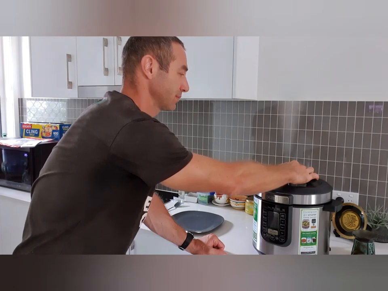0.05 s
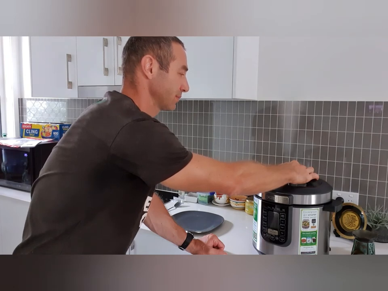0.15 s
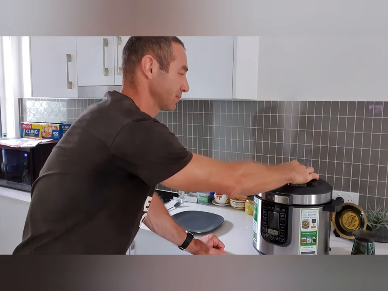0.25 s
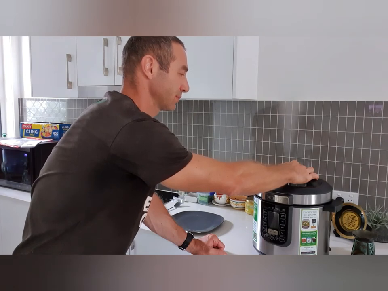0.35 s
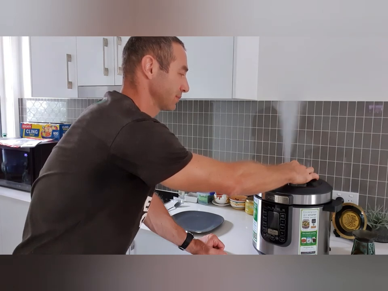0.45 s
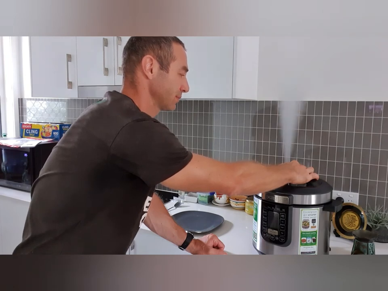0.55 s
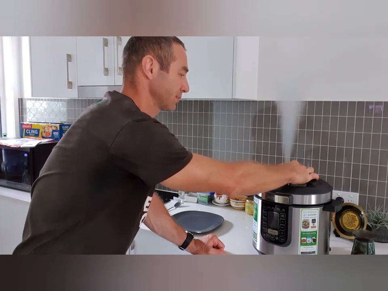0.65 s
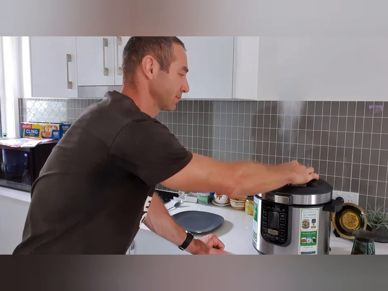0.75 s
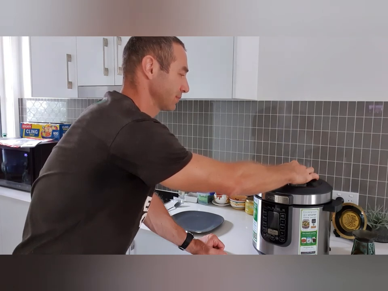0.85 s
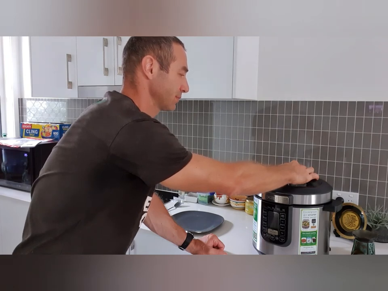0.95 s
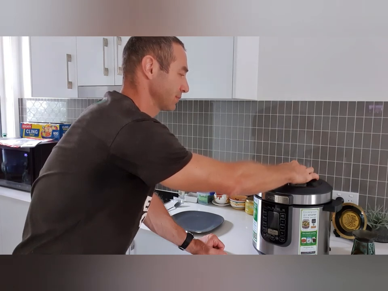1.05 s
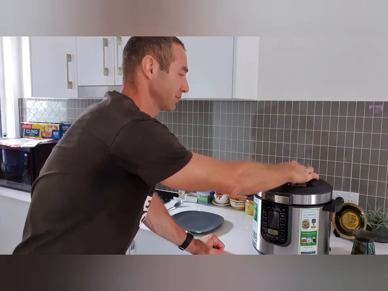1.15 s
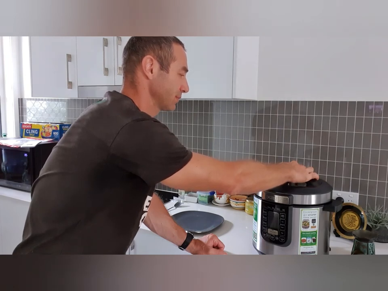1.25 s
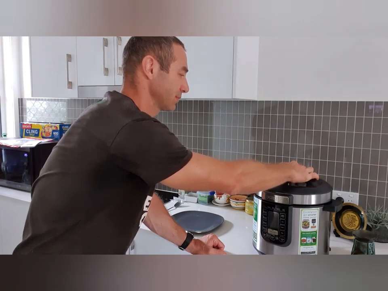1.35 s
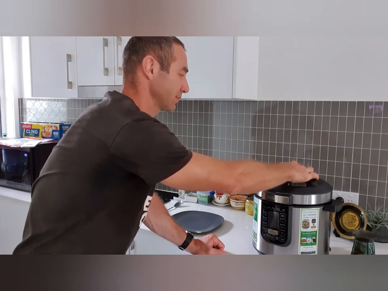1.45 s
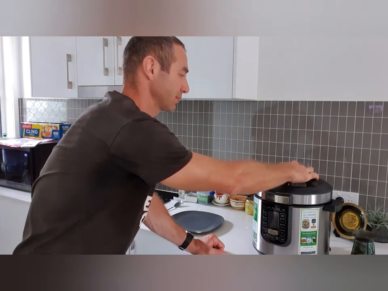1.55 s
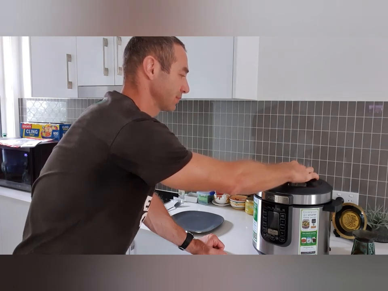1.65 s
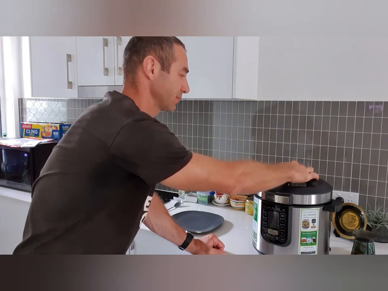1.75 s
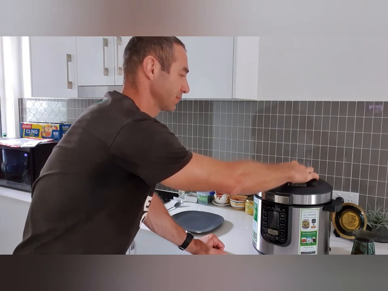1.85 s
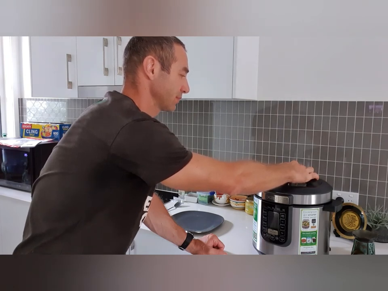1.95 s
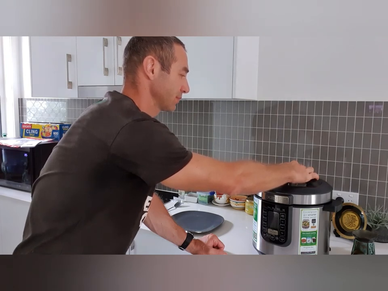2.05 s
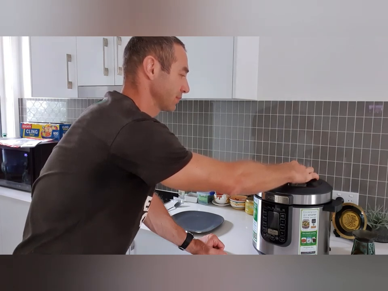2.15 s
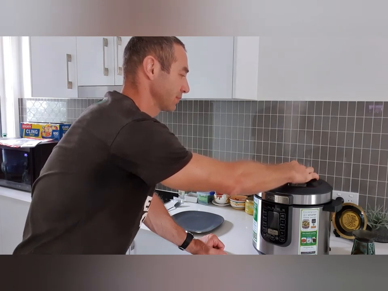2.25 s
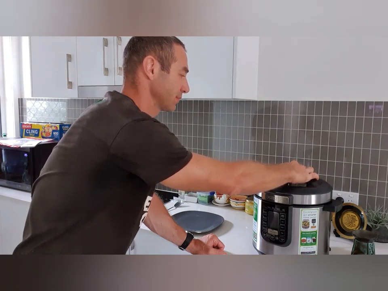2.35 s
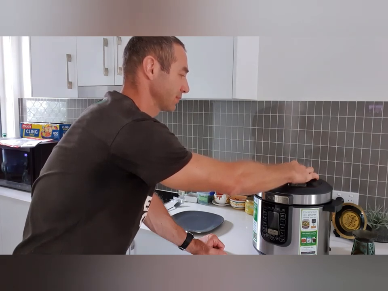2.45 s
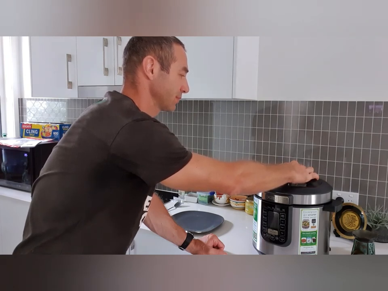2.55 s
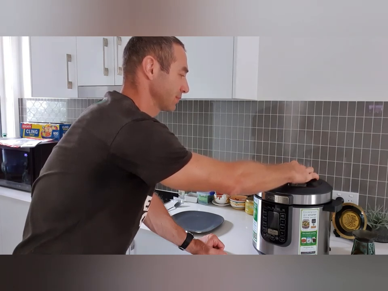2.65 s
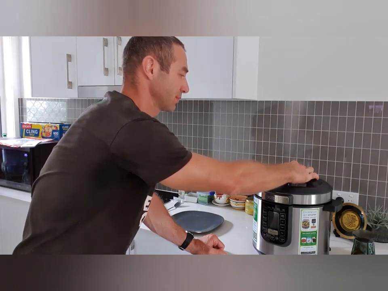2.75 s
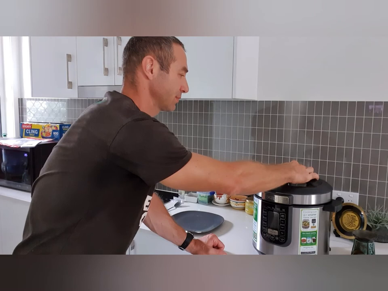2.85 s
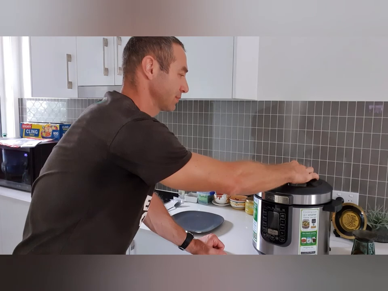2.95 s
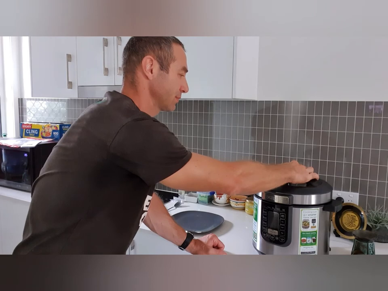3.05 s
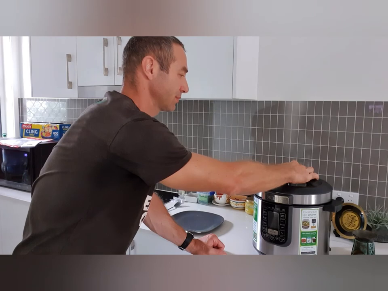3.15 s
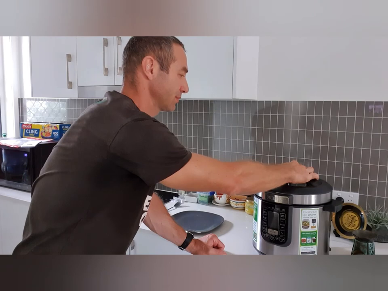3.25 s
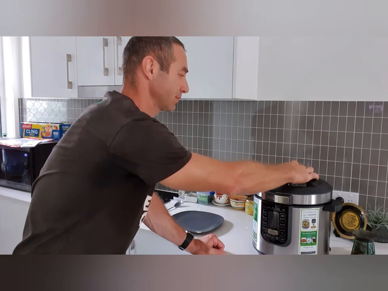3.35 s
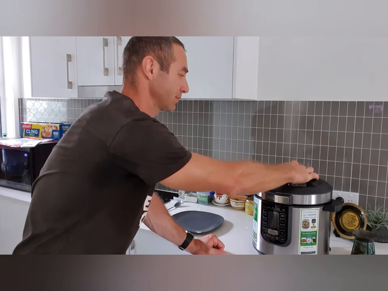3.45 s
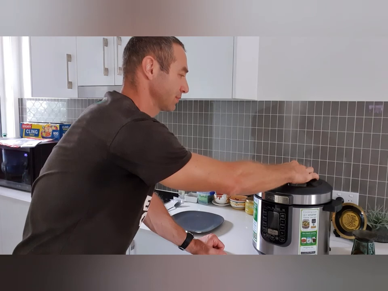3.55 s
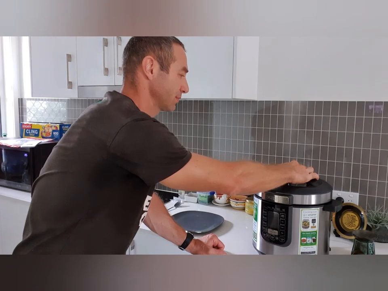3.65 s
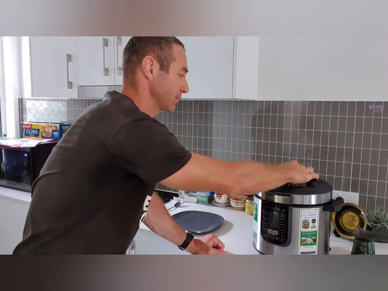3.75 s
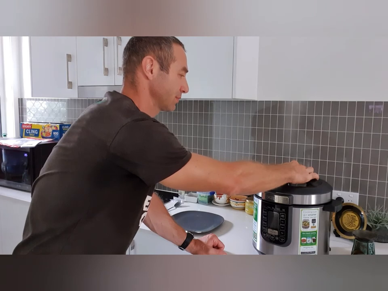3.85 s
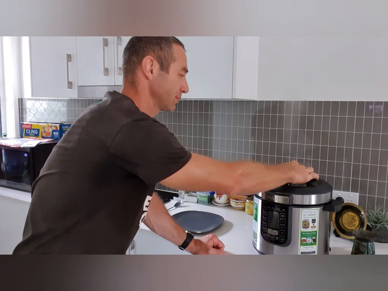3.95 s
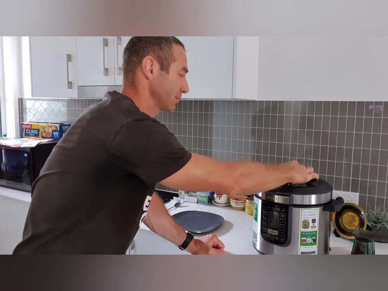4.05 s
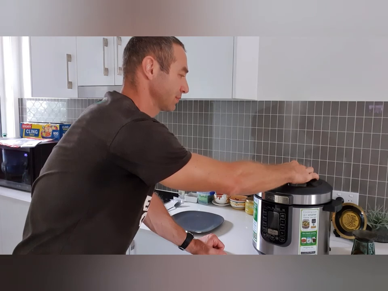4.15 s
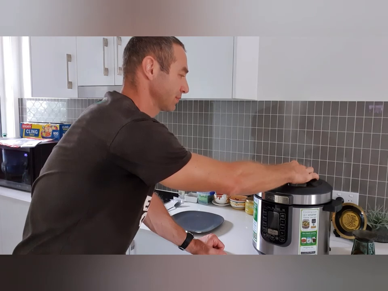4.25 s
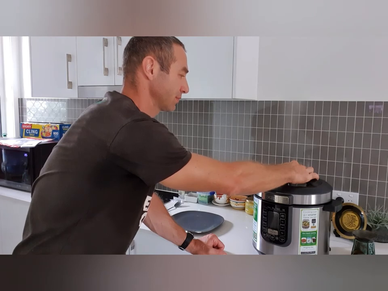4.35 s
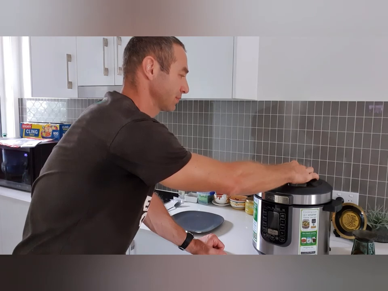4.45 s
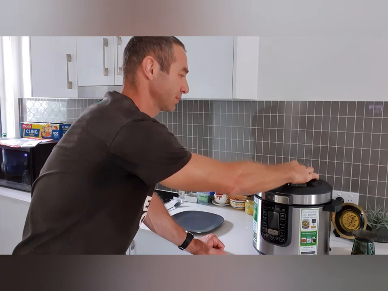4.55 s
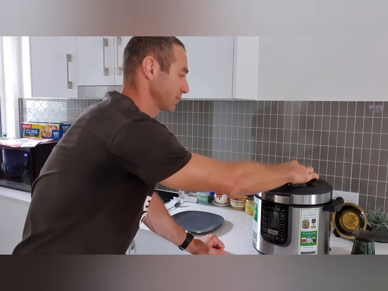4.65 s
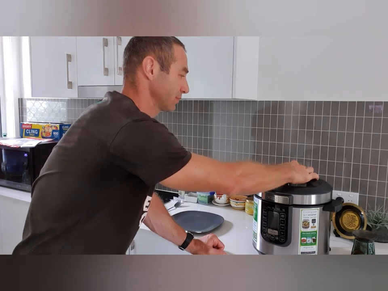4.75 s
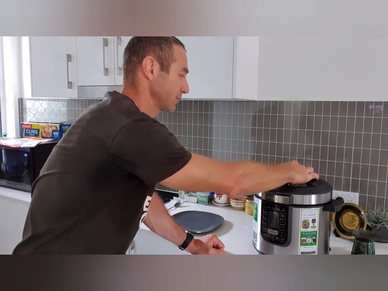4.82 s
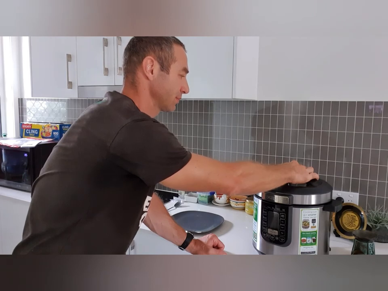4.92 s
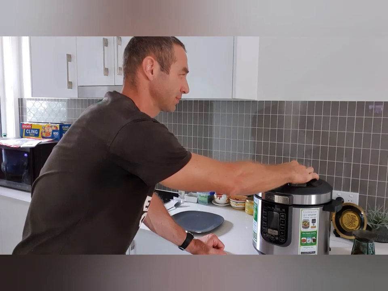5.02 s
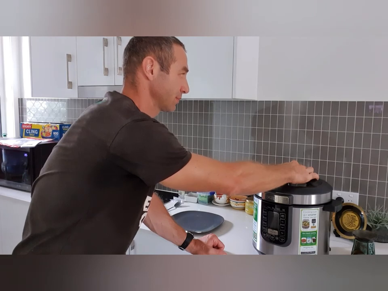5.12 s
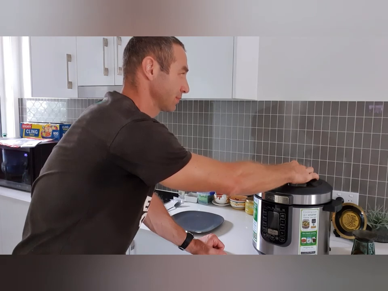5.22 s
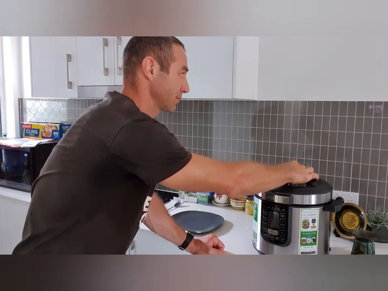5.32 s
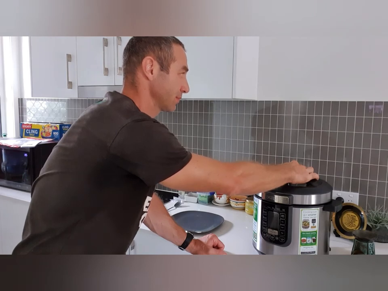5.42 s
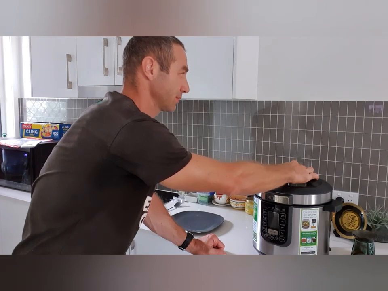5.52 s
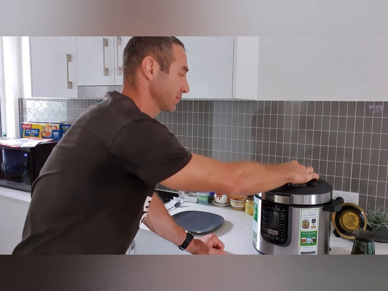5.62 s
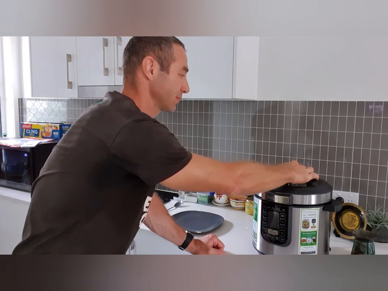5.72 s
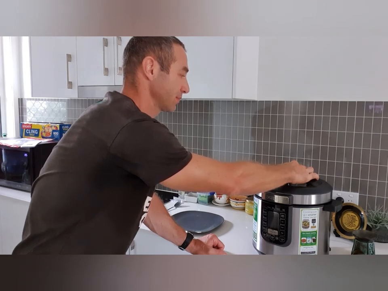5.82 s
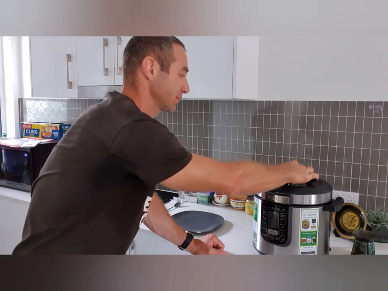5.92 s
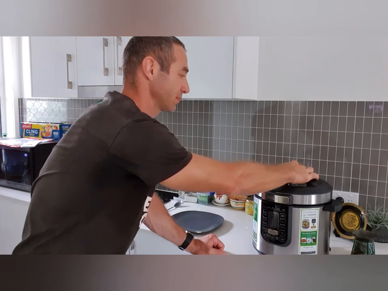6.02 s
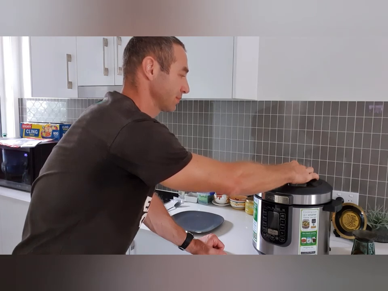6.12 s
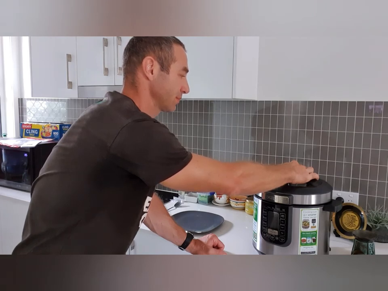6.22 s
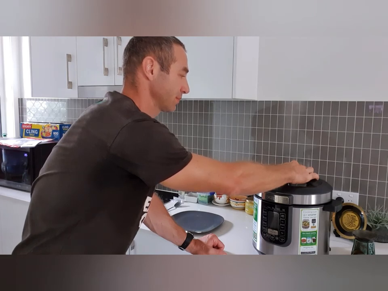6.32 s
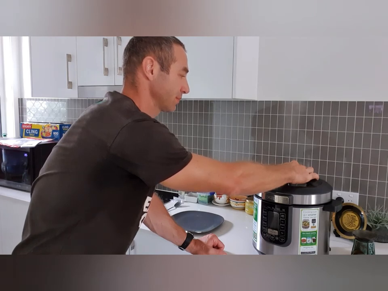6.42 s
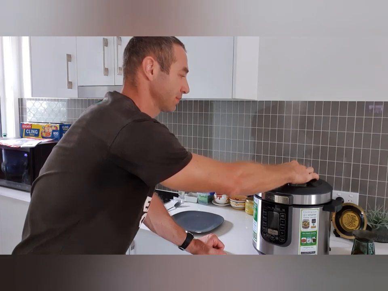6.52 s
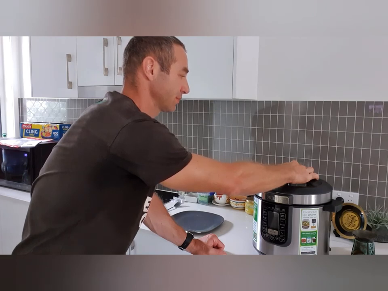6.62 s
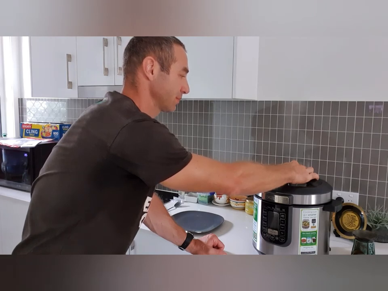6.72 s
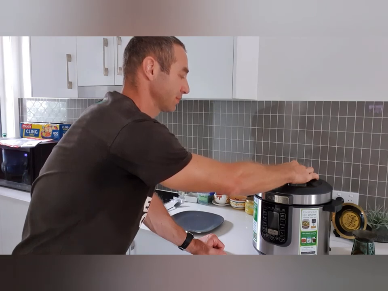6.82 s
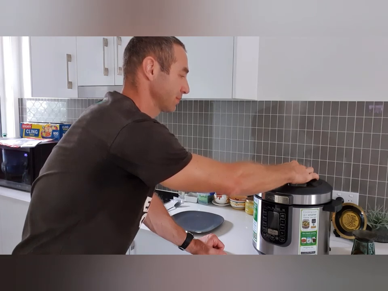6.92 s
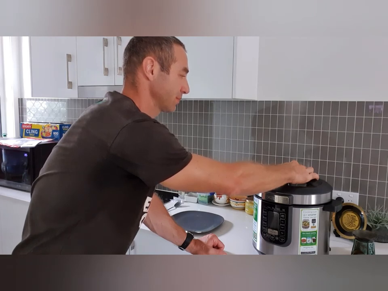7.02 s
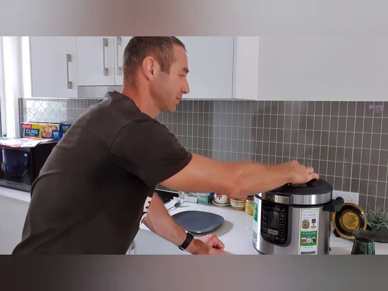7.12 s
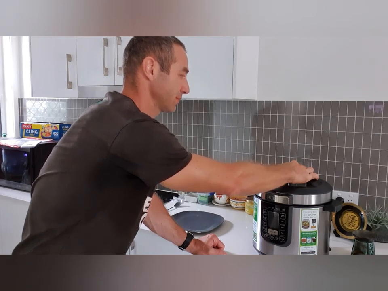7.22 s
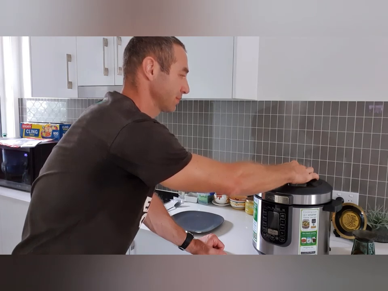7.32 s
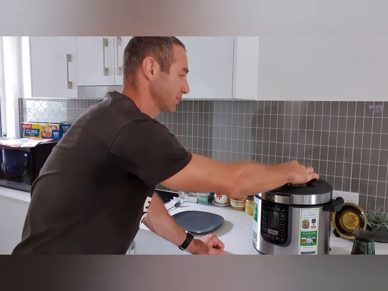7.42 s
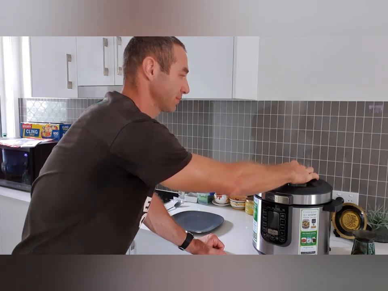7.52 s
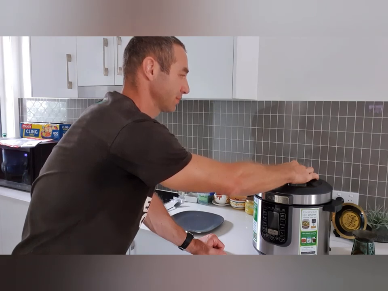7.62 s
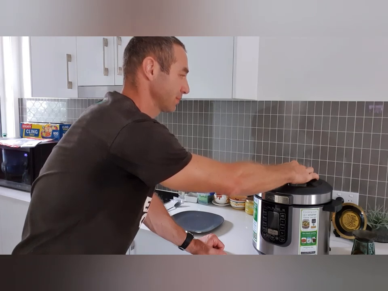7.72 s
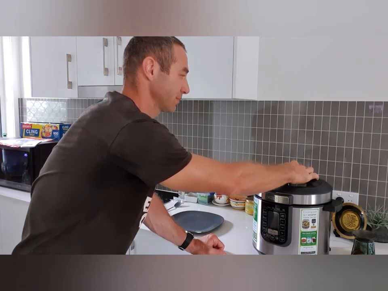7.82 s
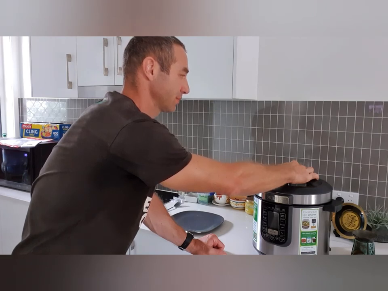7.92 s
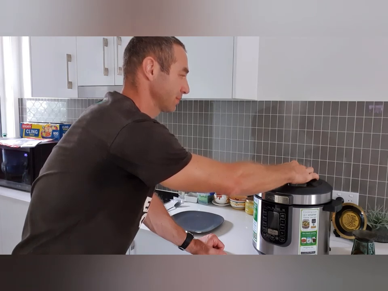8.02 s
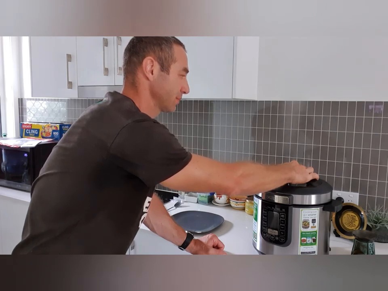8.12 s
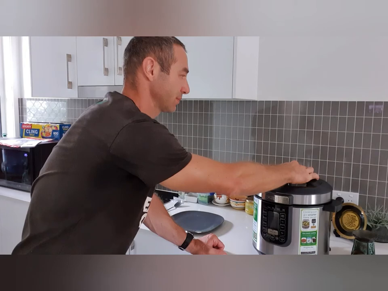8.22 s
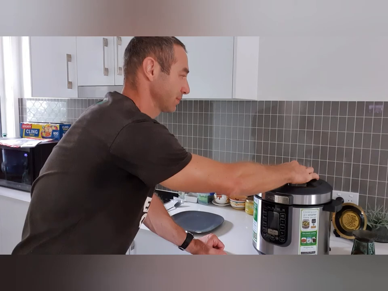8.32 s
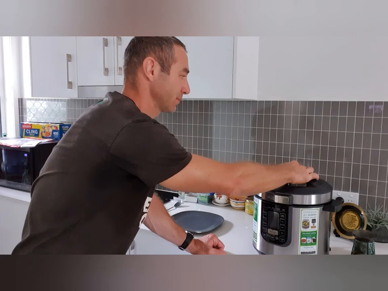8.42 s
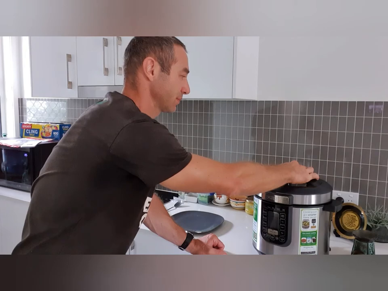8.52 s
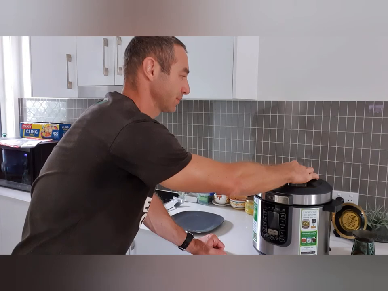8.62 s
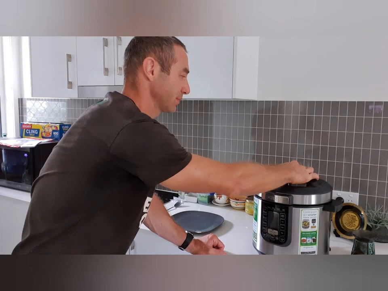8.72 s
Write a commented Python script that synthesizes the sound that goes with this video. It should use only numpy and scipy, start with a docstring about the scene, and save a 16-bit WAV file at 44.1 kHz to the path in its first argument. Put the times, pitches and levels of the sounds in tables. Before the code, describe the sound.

Steam hisses sharply from a cooker valve, bursts into a roar, stops dead, then after over a second reopens into a long, bright hiss.

```python
"""A hiss, then a roar: steam escapes from a pressure cooker valve in a tiled kitchen, heard by a stereo pair.
The valve hisses, opens wide so that the jet roars under the cupboard, shuts with a low push, reopens to a hiss.
Steam is coloured noise, shaped by valve gains and the narrow resonances of the lid and the niche.
The hard room rings on after the stop; a tap on the lid is a short ring of sines.
House noise and a low wavering hum lie underneath."""
import sys
import numpy as np
from scipy import signal
from scipy.fft import rfft, irfft, next_fast_len
from scipy.io import wavfile
from scipy.ndimage import uniform_filter1d, map_coordinates

SR = 44100
rng = np.random.default_rng(int(sys.argv[2]) if len(sys.argv) > 2 else 0)


def elevation(decibels):
    """Turn decibel levels (scalar or array-like) into linear amplitude ratios."""
    levels = np.asarray(decibels, float)
    return 10 ** (levels / 20)


def log_audio(samples):
    """Write samples as a 16-bit WAV file to the path given in sys.argv[1]."""
    # one column per channel
    frames = np.atleast_2d(samples).T
    # limit to full scale, then quantise
    limited = np.clip(frames, -1, 1)
    pcm = np.round(limited * 32767).astype(np.int16)
    wavfile.write(sys.argv[1], SR, pcm)


N = 386757


def unit(x):
    """Scale to rms 1."""
    return x / np.sqrt(np.mean(x ** 2) + 1e-20)


def along(points, hz):
    """(Hz, value) points read on a log frequency axis."""
    point_hz, value = np.transpose(points)
    return np.interp(np.log(hz + 1), np.log(point_hz + 1), value)


def levels(rows):
    """One value per sample for each column after the time."""
    s, *cols = np.transpose(rows)
    return np.array([np.interp(np.arange(N) / SR, s, c) for c in cols])


def since(start_s):
    """Seconds after a moment, zero before it."""
    return np.maximum(np.arange(N) / SR - start_s, 0)


def wobble(rate_hz):
    """Smooth random curve, rate_hz knots a second."""
    knots = rng.standard_normal(int(N * rate_hz / SR) + 4)
    return map_coordinates(knots, [np.arange(N) * rate_hz / SR])


def filtered(x, response):
    """x times a response of frequency."""
    n = x.shape[-1]
    m = next_fast_len(n + 8192)
    spectrum = rfft(x, m) * response(np.fft.rfftfreq(m, 1 / SR))
    return irfft(spectrum, m)[..., :n]


def noise(spectrum, count):
    """Unrelated coloured noises of rms 1."""
    white = rng.standard_normal((count, N))
    return unit(filtered(white, lambda hz: elevation(along(spectrum, hz))))


# left-right correlation: freq_hz, correlation
LIKENESS = [(60, 0.95), (130, 0.85), (290, 0.97), (640, 0.68), (1410, 0.11), (3100, 0), (6820, -0.06),
            (15000, -0.1)]


def pair(two):
    """Two unrelated signals become left and right: alike in the bass, unrelated in the treble."""
    def mid_side(hz):
        angle = np.arccos(np.clip(along(LIKENESS, hz), -1, .97)) / 2
        return np.array([np.cos(angle), np.sin(angle)])

    mid, side = filtered(two, mid_side)
    return np.array([mid + side, mid - side])


# reverberation time: freq_hz, t60_s
REVERB_TIME = [(150, 0.55), (600, 0.56), (2000, 0.66), (5000, 0.62), (9000, 0.54), (15000, 0.37)]


def kitchen(x, direct_db):
    """Direct path, left side first, and a tail whose every frequency dies at its own speed."""
    hz, t, grains = signal.stft(rng.standard_normal((2, SR)), SR, nperseg=256)
    t60_s = along(REVERB_TIME, hz)[:, None]
    decay = elevation(-60 * t / t60_s) / np.sqrt(t60_s)  # equal energy at every frequency
    tail = pair(signal.istft(grains * decay, SR, nperseg=256)[1])
    tail = tail / np.linalg.norm(tail) * np.sqrt(2)
    answer = np.pad(tail, ((0, 0), (200, 0)))
    answer[[0, 1], [0, 5]] = elevation(direct_db)  # relative to the tail; right 5 samples later
    answer = answer / np.sqrt(1 + elevation(2 * direct_db))
    before = x[SR // 3:0:-1]  # what sounds at the start was sounding already and fills the room
    wet = signal.fftconvolve(np.r_[before, x][None], answer, axes=1)
    return wet[:, len(before):][:, :N]


# resonances of the lid and the niche under the cupboard: centre_hz, width_hz, gain_db
RESONANCES = [(403, 43, 3.5), (596, 18, 8), (640, 14, 6.5), (680, 16, 6.5), (799, 40, 6.5), (1027, 50, 4.5),
              (1215, 21, 6.5), (1300, 22, 8), (1501, 25, 5), (1604, 31, 7.5), (1790, 16, 5), (1870, 21, 5),
              (1930, 22, 8.5), (2126, 35, 6.5), (2290, 26, 4.5), (2480, 30, 3.5), (2670, 30, 6.5),
              (2836, 40, 5.5), (5060, 21, 7), (5130, 22, 9.5), (5430, 35, 7), (5550, 25, 6),
              (5772, 19, 6.5), (5929, 21, 3), (6080, 30, 3.5), (8254, 25, 5), (8599, 22, 4), (8720, 21, 3),
              (9070, 25, 2.5), (9200, 25, 3.5)]


def niche(x):
    """Narrow resonances lift the noise."""
    def gain(f):
        return elevation(sum(db / (1 + (2 * (f - hz) / width) ** 2) for hz, width, db in RESONANCES))

    return filtered(x, gain)


# house noise: time_s, level_db
HOUSE_LEVEL = [(0, -75), (1.1, -61.5), (1.35, -63.5), (1.55, -57.5), (2.06, -56), (2.2, -51), (2.6, -50.5),
               (3.6, -54), (5, -57), (6.5, -54), (8.77, -62)]
# house noise spectrum: freq_hz, relative_db
HOUSE_SPECTRUM = [(15, -47), (28, -24.5), (52, -15.5), (115, -21), (170, -26), (235, -22.5), (300, -28),
                  (600, -24.5), (1000, -23.5), (1300, -31), (2200, -35), (2700, -44), (5000, -61.5),
                  (16000, -77)]
# hum before wavering: time_s, level_db, pitch_hz
HUM_COURSE = [(0, -72, 76), (1.44, -74, 73), (1.71, -60, 72), (2.4, -64, 70), (2.93, -55, 72),
              (3.6, -67, 77), (4.9, -63, 78), (5.3, -51, 78), (5.52, -63, 78), (5.74, -48.5, 78),
              (6.6, -49, 78), (6.8, -54, 78), (7.1, -55, 78), (7.69, -50, 78), (7.94, -55, 78),
              (8.09, -69, 78), (8.25, -54, 78), (8.55, -54, 78), (8.77, -67, 78)]
# faint tone a fifth above the hum, before wavering: time_s, level_db
FIFTH_LEVEL = [(4.2, -80), (4.6, -67), (6.6, -66), (6.9, -80)]
STRONG_HUM_DB, WAVER_DB_PER_DB = -47, .5  # the weaker the hum under this level, the more it wavers


def house():
    """Dull noise that reaches the right side first; a low unsteady hum with a weak third harmonic."""
    hum_db, hum_hz = levels(HUM_COURSE)
    phase = 2 * np.pi * np.cumsum(hum_hz + 1.1 * wobble(6.1)) / SR
    weakness_db = np.clip(STRONG_HUM_DB - hum_db, 0, 12)
    hum_db = hum_db + WAVER_DB_PER_DB * weakness_db * wobble(7)
    hum = elevation(hum_db) * (np.sin(phase) + elevation(-16) * np.sin(3 * phase))
    fifth = elevation(levels(FIFTH_LEVEL) + 2.5 * wobble(5)) * np.sin(3 / 2 * phase)
    left, right = pair(noise(HOUSE_SPECTRUM, count=2))
    left = np.roll(left, 14)  # samples later
    return np.sqrt(2) * (hum + fifth) + elevation(levels(HOUSE_LEVEL)) * np.array([left, right])


# a finger taps the lid: start_s, level_db (before onset, decay and room)
LID_TAPS = [(1.372, -45)]


def taps():
    """Short dull tick on the plastic lid: three sines, 30 ms t60."""
    out, t = np.zeros(N), np.arange(2000) / SR
    ring = sum(np.sin(2 * np.pi * hz * t) for hz in (1030, 1300, 1500))
    onset = 1 - np.exp(-t / 0.0005)
    for start_s, level_db in LID_TAPS:
        out[round(start_s * SR):][:len(t)] += elevation(level_db - 1 - 60 * t / 0.03) * onset * ring
    return kitchen(out, direct_db=-2.0)


THUMP_S, THUMP_DB, THUMP_HZ, THUMP_T60_S = .701, -36, 75, .14


def thump():
    """Low push as the valve shuts: a soft decaying sine, alike on both sides."""
    t = since(THUMP_S)
    envelope = elevation(THUMP_DB - 60 * t / THUMP_T60_S) * (1 - np.exp(-t / .004))
    return envelope * np.sin(2 * np.pi * THUMP_HZ * t)


SHUT_S = .009  # time constant


def gate(opens_s, shuts_s, rise_s):
    """Gain that climbs to 1 on opening and dies on shutting."""
    return (1 - np.exp(-since(opens_s) / rise_s)) * np.exp(-since(shuts_s) / SHUT_S)


# valve open: opens_s, shuts_s
VALVE_OPEN = [(-1, .7), (2.119, 10)]
# roar spectrum: freq_hz, relative_db
ROAR_SPECTRUM = [(29, -56.5), (55, -23.5), (170, -12.5), (287, -19.5), (389, -9), (471, -9), (600, -5.5),
                 (720, -9.5), (830, -7.5), (1120, -7), (1600, -7.5), (1950, -13), (2150, -20),
                 (3000, -42.5), (5000, -120)]
ROAR_START_S, ROAR_DB, ROAR_RISE_S, ROAR_SURGE_DB = .372, -28, .015, 4
SURGE_S = .08  # time constant of an overshoot


def roar(parts=3):
    """Large eddies where the full jet strikes the cupboard, until the valve shuts."""
    surge_db = ROAR_SURGE_DB * np.exp(-since(ROAR_START_S) / SURGE_S)
    level = gate(ROAR_START_S, VALVE_OPEN[0][1], ROAR_RISE_S) * elevation(ROAR_DB + surge_db)
    eddies = level * elevation(1.5 * wobble(40)) * niche(noise(ROAR_SPECTRUM, count=parts))
    return sum(kitchen(part, direct_db=-2.5) for part in eddies) / np.sqrt(parts)


# valve positions, each held until the next: start_s, fizz_db, body_db, sheen_db, throat_db
VALVE_POSITIONS = [(0, -21.5, -31.5, 1.5, 0), (.385, -23, -30, -8.5, 0), (2.12, -26, -33.5, 0, 5),
                   (2.46, -22.5, -32, 0, .5), (2.98, -21.5, -30.5, -.5, 0), (3.52, -21.5, -32, -1, -1)]
# sudden widening, flow overshoots: start_s, overshoot_db
FLOW_SURGES = [(.38, 2), (2.47, 3)]
FIZZ_RISE_S, BODY_RISE_S = .012, .018  # time constants
TURN_S = .06  # from one position to the next
SAG_DB_PER_S = .2  # pressure falls from the last position on


def valve():
    """Gains of fizz and body and the colour of the fizz, from positions, surges and falling pressure."""
    start_s, *cols = np.transpose(VALVE_POSITIONS)
    held = np.array(cols)[:, np.searchsorted(start_s[1:], np.arange(N) / SR)]
    turned = uniform_filter1d(held, int(TURN_S * SR), axis=1, mode="nearest")
    fizz_db, body_db, sheen_db, throat_db = turned
    surge_db = sum(db * (since(at) > 0) * np.exp(-since(at) / SURGE_S) for at, db in FLOW_SURGES)
    flow_db = surge_db - SAG_DB_PER_S * since(start_s[-1])
    fizz_gate = sum(gate(a, b, FIZZ_RISE_S) for a, b in VALVE_OPEN)
    body_gate = sum(gate(a, b, BODY_RISE_S) for a, b in VALVE_OPEN)
    fizz, body = fizz_gate * elevation(fizz_db + flow_db), body_gate * elevation(body_db + flow_db)
    return fizz, body, elevation(sheen_db) - 1, elevation(throat_db) - 1


# treble turbulence spectrum: freq_hz, relative_db
FIZZ_SPECTRUM = [(1410, -33.5), (2400, -6.5), (2900, -5.5), (3550, -5), (3720, -9.5), (3950, -6),
                 (4500, -6), (5920, -2), (6810, -7), (8970, -2), (11400, -4), (13600, -8), (15200, -6.5),
                 (15600, -8)]
# lower turbulence spectrum: freq_hz, relative_db
BODY_SPECTRUM = [(76, -55.5), (130, -25), (400, -23.5), (541, -20.5), (795, -14.5), (881, -15), (1020, -7),
                 (1120, -11.5), (1280, -3.5), (1860, -1), (2800, -12), (3640, -36), (6160, -120)]
SHEEN_HZ, THROAT_HZ, THROAT_WIDTH_HZ = 7500, 5240, 600


def jet(parts=6):
    """Long plume: its parts make unrelated turbulence, each reaching the pair by its own paths."""
    fizz, body, sheen, throat = valve()
    flutter = wobble(8.3) + .45 * wobble(4)  # unsteady flow through the valve
    hiss = niche(noise(FIZZ_SPECTRUM, count=parts))
    top_treble = filtered(hiss, lambda hz: 1 / (1 + (SHEEN_HZ / (hz + 1)) ** 4))
    ringing = filtered(hiss, lambda hz: np.exp(-((hz - THROAT_HZ) / THROAT_WIDTH_HZ) ** 2))
    hiss = hiss + sheen * top_treble  # sheen raises or lowers the top treble of the fizz
    hiss = hiss + throat * ringing  # the half-open valve resonates
    fizz = fizz * elevation(.45 * flutter + .6 * wobble(60)) * hiss
    body = body * elevation(0.24 * flutter) * niche(noise(BODY_SPECTRUM, count=parts))
    return sum(kitchen(part, direct_db=-7.5) for part in fizz + body) / np.sqrt(parts)


def scene():
    """All sources at the pair of microphones."""
    return jet() + roar() + thump() + taps() + house()


def band_limit(x):
    """A steep low-pass at the top of the band."""
    return signal.sosfilt(signal.butter(12, 17060, fs=SR, output="sos"), x)


# stereo balance: freq_hz, left_over_right_db
BALANCE = [(60, -0.5), (180, -1.0), (550, -1.5), (1650, -1), (4970, 1.5), (15000, 5.5)]
TOP_HZ = 15740


def record(dry):
    """The left microphone faces the treble more; a steep edge limits the band."""
    def response(hz):
        edge = 1 / (1 + np.exp(np.clip((hz - TOP_HZ) / 12, -50, 50)))
        return edge * elevation(along(BALANCE, hz) * np.array([[.5], [-.5]]))

    mix = filtered(dry, response)
    return band_limit(mix)


dry = scene()
out = record(dry)
log_audio(out)
```